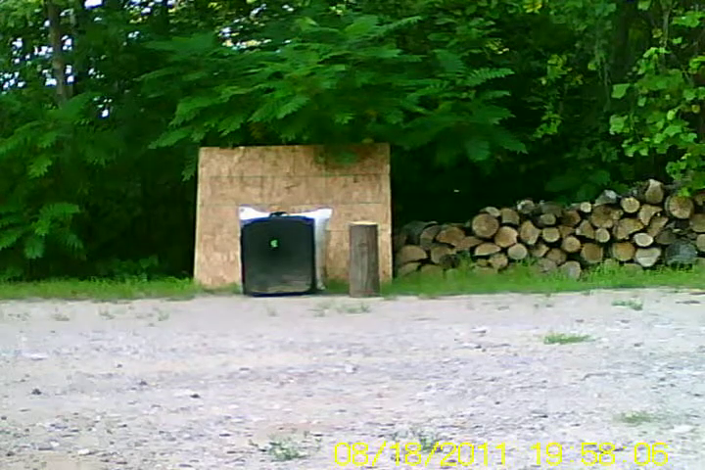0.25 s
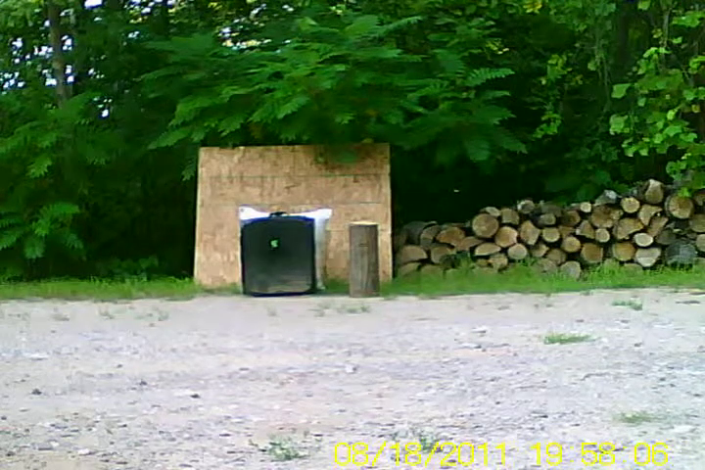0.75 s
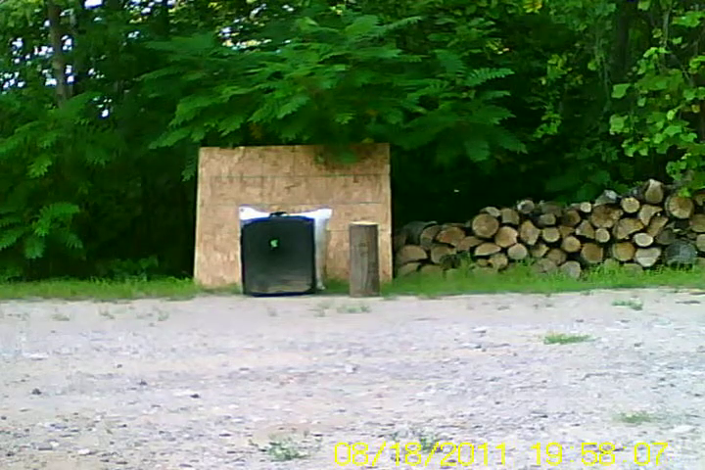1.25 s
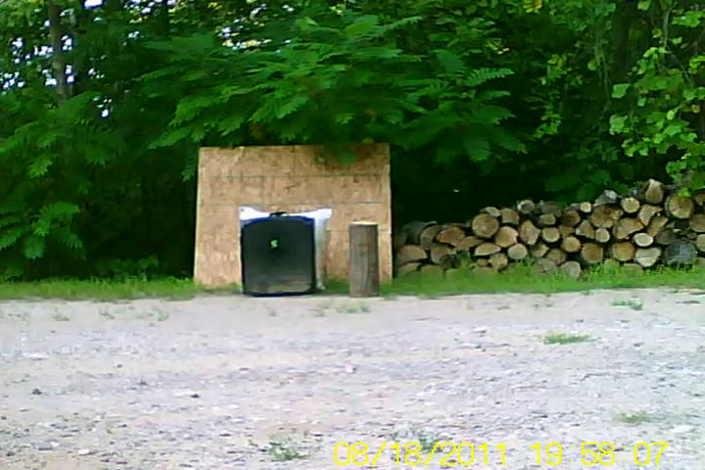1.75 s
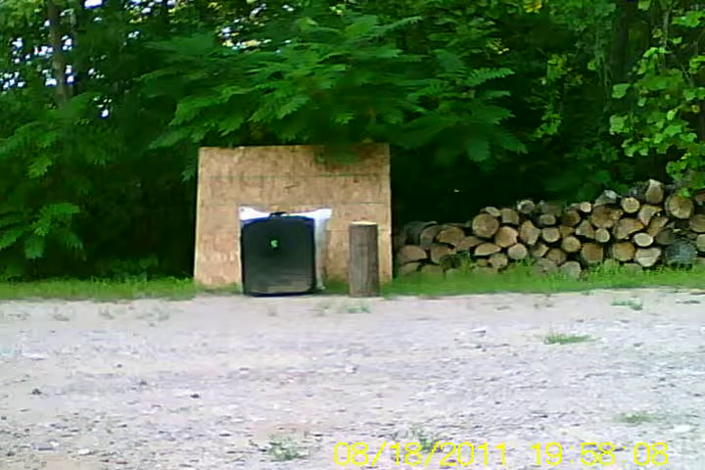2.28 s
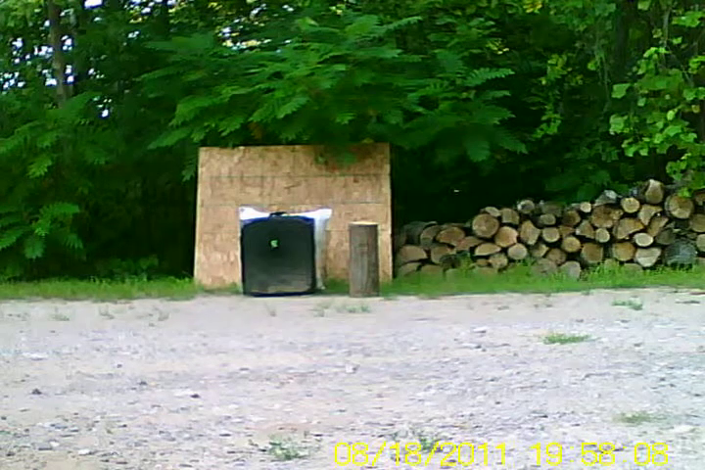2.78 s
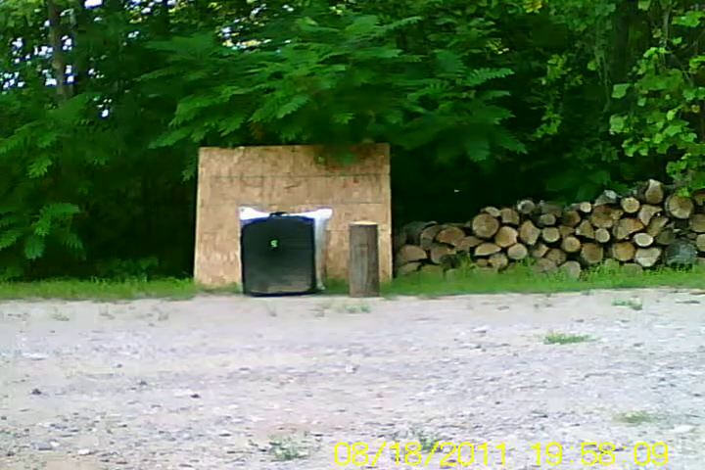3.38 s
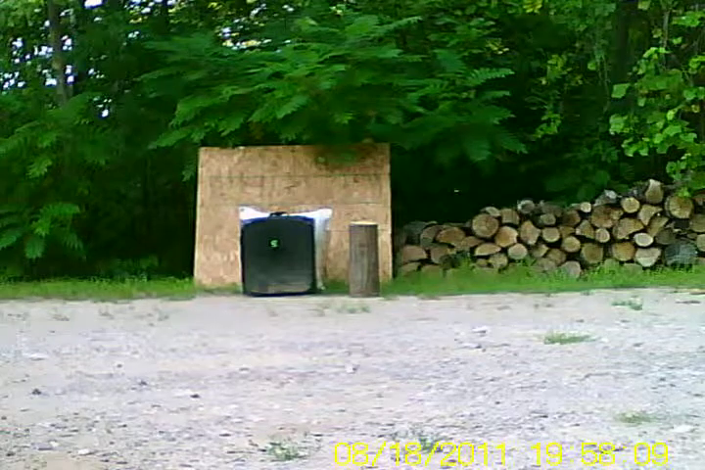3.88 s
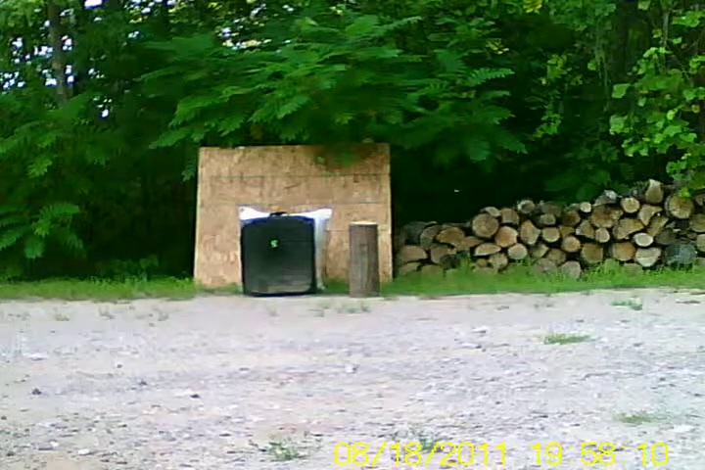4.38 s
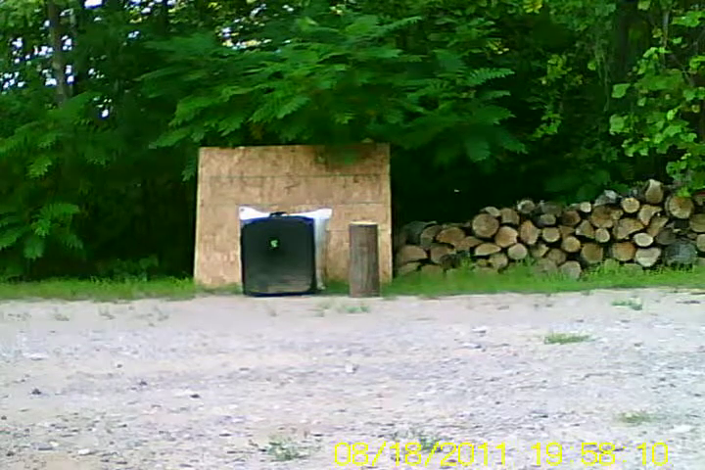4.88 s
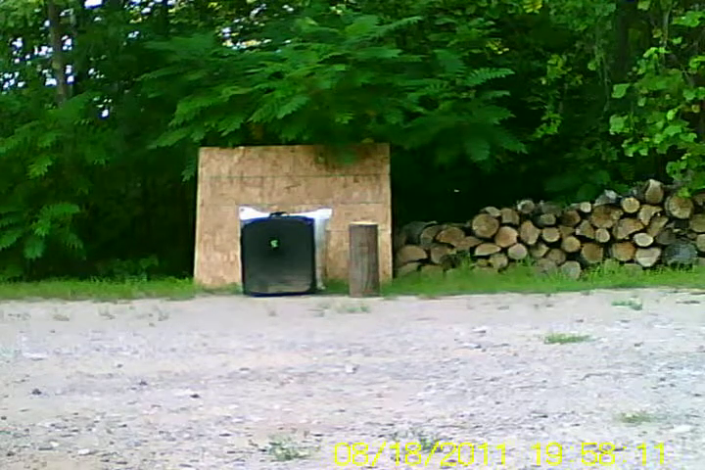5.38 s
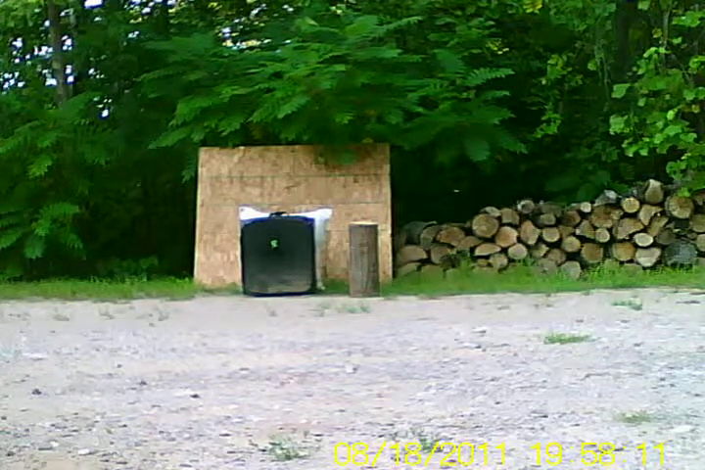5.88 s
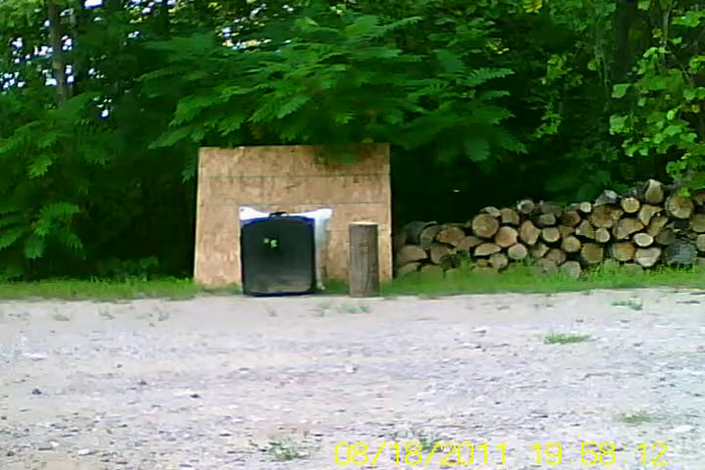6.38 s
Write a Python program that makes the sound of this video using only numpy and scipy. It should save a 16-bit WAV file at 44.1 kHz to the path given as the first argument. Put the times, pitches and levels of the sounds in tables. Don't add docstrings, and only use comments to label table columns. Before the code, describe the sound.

Outdoors in a yard, crickets chirp near and far over low rumble and recorder hiss, with three katydid rasps. Small hard clicks tick around two seconds, and a faint bird whistles. Near six seconds a bowstring slaps and rattles, an arrow whirs close past the microphone, and it thuds very loudly into a foam block, echoing off wood and trees.

```python
import sys
import numpy as np
from scipy import signal
from scipy.fft import rfft, irfft, next_fast_len
from scipy.io import wavfile

SR = 44100
rng = np.random.default_rng(int(sys.argv[2]) if len(sys.argv) > 2 else 0)


def wav_record(signal):
    frames = np.transpose(np.atleast_2d(signal))
    bounded = np.clip(frames, -1, 1)
    quanta = np.round(bounded * 32767).astype(np.int16)
    wavfile.write(sys.argv[1], SR, quanta)


def amplitude_ratio(level_db):
    exponent = np.asarray(level_db, float) / 20
    return 10 ** exponent


N = 292824
TIME = np.arange(N) / SR
LEAVES_S, STRIKES_S = 5.9, 6.055

# pitch_hz, density_db
AIR_SPECTRUM = [(8, -22), (18, 0), (40, 0), (90, -7), (180, -14), (350, -20), (700, -25.5), (1400, -30),
                (2800, -34.5), (5500, -36), (9000, -38), (11500, -42.5), (14000, -80)]
# time_s, level_db
ENGINE_LEVEL = [
    (0, -59),
    (1.1, -60),
    (1.6, -79),
    (6.64, -70),
]
# pitch_hz, width_hz, level_db
CRICKET_HAZE = [(4350, 700, -75.5), (4850, 600, -75.5)]
# centre_s, level_db
BIRD_NOTES = [
    (2.7, -72),
    (2.77, -70),
    (2.825, -65),
    (2.87, -72),
]
# start_s, level_db
KATYDID_RASPS = [
    (1.178, -57),
    (3.185, -58.5),
    (5.352, -58),
]
# pitch_hz, density_db
KATYDID_SPECTRUM = [(3300, -30), (4200, -3), (5200, -5), (6000, 1), (6800, -7), (7600, -6), (9000, -30)]
# middle_stroke_s, level_db
FAINT_CHIRPS = [(.47, -73), (.66, -71), (2.55, -69), (3.2, -71), (5.62, -73), (6.5, -72)]
# main_stroke_s, level_db
FAR_CHIRPS = [(.196, -53.5), (.437, -61.5), (.599, -53), (1.109, -52.5), (1.711, -54), (2.206, -53.5),
              (2.573, -54), (3.103, -53.5), (3.551, -52), (4.033, -52.5), (4.426, -53), (4.788, -52),
              (5.239, -52.5), (5.822, -54.5)]
# offset_s, level_db
FAR_STROKES = [
    (-.082, -14),
    (-.041, -2.5),
    (0, 0),
    (.044, .5),
]
# middle_stroke_s, level_db
NEAR_CHIRPS = [(.3365, -52), (1.3116, -50.5), (2.0434, -50.5), (2.9517, -51.5), (3.5265, -53),
               (4.0775, -52), (4.6303, -50.5), (5.1367, -50.3)]
# offset_s, level_db
NEAR_STROKES = [
    (-.0425, -9),
    (0, 0),
    (0.0473, 1.5),
]
# pitch_hz, t60_s
TREE_DECAY = [(150, .3), (600, 0.26), (1500, 0.67), (5000, 0.65), (10000, 0.39)]
# start_s, level_db, pitch_hz
GEAR_TICKS = [
    (1.998, -48, 2880),
    (2.012, -40, 2560),
    (2.092, -38, 2610),
]
# delay_s, level_db
TICK_ECHOES = [
    (.0085, -7),
    (.013, -5),
    (.021, -8),
    (.03, -12),
]
# pitch_hz, density_db
TRIGGER_SPECTRUM = [(1800, -28), (2600, -4), (3400, -10), (4600, 0), (6500, -8), (10000, -11), (13000, -40)]
# start_s, level_db, t60_s
STRING_SNAPS = [
    (5.895, -18.5, 0.022),
    (5.903, -21, 0.018),
    (5.913, -25, 0.037),
]
# pitch_hz, density_db
SNAP_SPECTRUM = [(300, -32), (900, 3), (1400, 2), (2600, 0), (4000, 0), (5700, -3.5), (7600, -10.5),
                 (10500, -20), (13000, -37)]
# pitch_hz, level_db, t60_s
LIMB_MODES = [(96, -22, 0.046), (230, -23, 0.046), (447, -24, 0.05), (628, -25.5, 0.065),
              (1290, -31.5, 0.078)]
# pitch_hz, density_db
RUSH_SPECTRUM = [(150, -26), (500, 1), (1300, -2), (2400, 0), (4000, -2.5), (5800, -6.5), (7600, -10),
                 (9000, -18), (11500, -18), (13000, -53)]
# pitch_hz, level_db, t60_s
VANE_SLAP = [(2100, -20.5, 0.035), (2520, -24, .04), (4020, -26.5, 0.033)]
# start_s, level_db, sense, pitch_hz, t60_s
KNOCKS = [
    (6.0546, 9, -1, 563, 0.0048),
    (6.059, 15.5, 1, 800, 0.0028),
    (6.0596, 20.5, -0.96, 664, 0.0037),
    (6.0628, 5, 1, 890, 0.0056),
    (6.0642, 6, 1, 710, 0.0068),
    (6.0663, 3.5, -0.92, 332, 0.0078),
]
# pitch_hz, level_db, t60_s
BLOCK_MODES = [(260, -16.5, .05), (396, -27, .04), (572, -16.5, .04), (780, -20, .04), (970, -21, .03),
               (1190, -15.5, .035), (1550, -11, .025), (1950, -17.5, 0.031), (2360, -22, 0.029)]
# pitch_hz, level_db, t60_s
BOARD_MODES = [(119, -2.5, 0.052), (174, -21, 0.071)]
# pitch_hz, density_db
TEAR_SPECTRUM = [(700, -24), (1600, 1), (2600, -11), (3800, -3), (5000, 3), (6200, -4), (7800, -7),
                 (11000, -23), (13000, -60)]
# pitch_hz, density_db
NEAR_ECHO_SPECTRUM = [(59, -30), (100, -4), (185, -1), (514, -9), (833, -7), (972, -13.5), (2450, -21),
                      (3270, -31), (5830, -27.5), (10000, -49), (13000, -80), (22000, -120)]
# pitch_hz, density_db
FAR_ECHO_SPECTRUM = [(180, -33), (300, -3), (550, -4), (595, -6), (1440, -5), (3440, -18), (5740, -15.5),
                     (7000, -28), (9100, -58), (15400, -120)]
# delay_s, level_db, favoured_hz
WALLS = [
    (.044, -17, 230),
    (.078, -25, 2100),
    (.138, -29, 1550),
    (.182, -32, 1250),
]


def unit(x):
    return x / np.sqrt(np.mean(x ** 2))


def along(points, hz):
    f, v = np.transpose(points)
    return np.interp(np.log(hz + 1), np.log(f + 1), v)


def noise(gain):
    m = next_fast_len(N)
    spectrum = rfft(rng.standard_normal(m)) * gain(np.fft.rfftfreq(m, 1 / SR))
    return unit(irfft(spectrum, m)[:N])


def peak_noise(hz, width):
    return noise(lambda f: 1 / (1 + ((f - hz) / width * 2) ** 2))


def coloured(spectrum):
    return noise(lambda hz: amplitude_ratio(along(spectrum, hz)))


def patchy(spectrum, depth_db, rate_hz):
    lumps = amplitude_ratio(depth_db * peak_noise(0, 2 * rate_hz))
    return unit(lumps * coloured(spectrum))


def dying(start, t60, attack):
    t = np.maximum(TIME - start, 0)
    return (1 - np.exp(-t / attack)) * amplitude_ratio(-60 * t / t60)


def ring(modes, start, attack):
    return sum(amplitude_ratio(db) * dying(start, t60, attack) * np.sin(2 * np.pi * hz * (TIME - start))
               for hz, db, t60 in modes)


def smear(x, tail):
    return signal.fftconvolve(x, tail / np.linalg.norm(tail))[:N]


def air():
    return amplitude_ratio(-46.5) * coloured(AIR_SPECTRUM)


def engine():
    level_db = np.interp(TIME, *np.transpose(ENGINE_LEVEL))
    return amplitude_ratio(level_db) * peak_noise(184, 9)


def cricket_haze():
    haze = np.zeros(N)
    for hz, width, db in CRICKET_HAZE:
        swell = amplitude_ratio(3.9 * peak_noise(0, 2.9))
        haze += amplitude_ratio(db) * swell * peak_noise(hz, width)
    return haze


def bird():
    notes = sum(amplitude_ratio(db) * np.exp(-((TIME - s) / .018) ** 2) for s, db in BIRD_NOTES)
    return notes * peak_noise(2750, 140)


def katydid():
    teeth = 1 + .5 * np.sin(2 * np.pi * 62 * TIME)
    rasps = sum(amplitude_ratio(db) * dying(s, 0.8, 0.013) for s, db in KATYDID_RASPS)
    return rasps * teeth * coloured(KATYDID_SPECTRUM)


def chirps(calls, strokes, scatter_db, scatter_s):
    luck = rng.standard_normal((len(calls), len(strokes), 2))
    return [(s + ds + scatter_s * late, db + step + scatter_db * loud)
            for (s, db), row in zip(calls, luck)
            for (ds, step), (late, loud) in zip(strokes, row)]


def cricket(strokes, hz, fall_hz, length, rough_hz, wet_db, t60):
    song = np.zeros(N)
    u = np.linspace(-1, 1, round(length * SR))
    for s, db in strokes:
        waver = rough_hz * np.sin(rng.uniform(3.8, 9) * u + rng.uniform(0, 2 * np.pi))
        pitch = hz + 9 * (db + 52) - fall_hz * u + waver
        swell = np.sqrt(np.abs(1 - u ** 2))
        tone = amplitude_ratio(db) * swell * np.sin(2 * np.pi * np.cumsum(pitch) / SR)
        first = round((s - .0015) * SR) - len(u) // 2
        song[first:first + len(u)] += tone
    leaves = rng.standard_normal(SR // 4) * amplitude_ratio(-60 * TIME[:SR // 4] / t60)
    return song + amplitude_ratio(wet_db) * smear(song, leaves)


def crickets():
    near_strokes = chirps(NEAR_CHIRPS, NEAR_STROKES, .8, .001)
    near = amplitude_ratio(.8) * cricket(near_strokes, 4390, 200, .019, rough_hz=25, wet_db=-7, t60=.12)
    far_strokes = chirps(FAR_CHIRPS, FAR_STROKES, 0.51, 0.0011)
    far = amplitude_ratio(-3.5) * cricket(far_strokes, 5030, 0, .023, rough_hz=45, wet_db=0, t60=.25)
    skirt = amplitude_ratio(-8) * cricket(far_strokes, 4820, 80, .014, rough_hz=60, wet_db=3, t60=.2)
    faint_strokes = chirps(FAINT_CHIRPS, FAR_STROKES, 1.5, .002)
    faint = cricket(faint_strokes, 4450, 250, .018, rough_hz=120, wet_db=10, t60=.25)
    return near + far + skirt + faint


def trees(x, delay):
    hz, t, z = signal.stft(rng.standard_normal(SR // 2), SR, nperseg=256)
    decay = amplitude_ratio(-60 * t / along(TREE_DECAY, hz)[:, None])
    tail = signal.istft(z * decay, SR, nperseg=256)[1]
    return smear(np.pad(x, (round(delay * SR), 0)), tail)


def walls(x):
    back = np.zeros(N)
    for delay, db, hz in WALLS:
        blur = rng.standard_normal(SR // 10) * dying(0, .07, .006)[:SR // 10]
        favoured = signal.butter(N=3, Wn=[hz / 1.4, hz * 1.5], btype="band", fs=SR, output="sos")
        band = signal.sosfilt(favoured, x)
        back += amplitude_ratio(db) * np.roll(smear(band, blur), round(delay * SR))
    return back


def gear_ticks():
    dry = np.zeros(N)
    for s, db, hz in GEAR_TICKS:
        modes = [(hz, db - .6, .013), (1.26 * hz, db - 2, .008), (1.53 * hz, db - 4, .006), (.8 * hz, db - 4, .008)]
        dry += ring(modes, s, 0.00073)
    echoes = sum(amplitude_ratio(db) * np.roll(dry, round(delay * SR)) for delay, db in TICK_ECHOES)
    return dry + echoes + amplitude_ratio(-7) * trees(dry, delay=.005)


def bow():
    click = amplitude_ratio(-36) * dying(5.8815, 0.07, .002) * patchy(TRIGGER_SPECTRUM, depth_db=2, rate_hz=400)
    snaps = sum(amplitude_ratio(db) * dying(s, t60, 0.001) for s, db, t60 in STRING_SNAPS)
    rattle = snaps * patchy(SNAP_SPECTRUM, depth_db=3, rate_hz=380)
    limbs = ring(LIMB_MODES, 5.896, 0.00063)
    rebound = amplitude_ratio(-4) * ring(LIMB_MODES[1:], 5.9053, 0.0005)
    return click + rattle - limbs - rebound


def arrow(passes=5.98, speed=62, miss=0.46, whir_hz=655):
    ahead = speed * (passes - TIME)
    metres = np.hypot(ahead, miss)
    toward = ahead / metres
    pitch = whir_hz / (1 - speed / 343 * toward)
    phase = 2 * np.pi * np.cumsum(pitch * (TIME > LEAVES_S)) / SR
    flying = dying(LEAVES_S, 1e3, .0064) * (TIME < STRIKES_S) / np.hypot(metres, .8)
    bent = (1 - np.cos(2 * np.pi * 28 * (TIME - 5.957))) / 2
    full = amplitude_ratio(-20.5 - 11 * bent ** 2) * np.sin(phase)
    half = amplitude_ratio(-22.5 - 16 * (1 - bent)) / np.sqrt(metres) * np.sin(phase / 2 + 1.4)
    fade_db = -1400 * np.maximum(TIME - passes + .004, 0)
    whir = flying * amplitude_ratio(fade_db) * (full + half)
    passing_hiss = amplitude_ratio(-31 - 5.5 * (1 - toward) / 2) * flying
    launch_hiss = amplitude_ratio(-29) * dying(LEAVES_S, .14, .015)
    rush = (passing_hiss + launch_hiss) * patchy(RUSH_SPECTRUM, depth_db=2.0, rate_hz=350)
    push = np.exp(-((TIME - 5.975) / 0.013) ** 2)
    wake = amplitude_ratio(-22.5) * push * np.sin(2 * np.pi * 113 * (TIME - 5.9665))
    return whir + rush + wake + ring(VANE_SLAP, 5.9765, 0.00085)


def target():
    knocks = sum(sense * ring([(hz, db, t60)], s, .002) for s, db, sense, hz, t60 in KNOCKS)
    tear = amplitude_ratio(-19.5) * dying(6.0546, 0.032, 0.00096) * coloured(TEAR_SPECTRUM)
    tip = amplitude_ratio(-7) * ring(BLOCK_MODES[-4:], 6.0552, .0006)
    block = ring(BLOCK_MODES, 6.0597, .0006)
    board = ring(BOARD_MODES, 6.0615, 0.0032)
    blow = knocks + tip + block + tear + board
    near = amplitude_ratio(-17.5) * dying(6.061, .14, 0.0036) * patchy(NEAR_ECHO_SPECTRUM, depth_db=1.0, rate_hz=120)
    far = amplitude_ratio(-37) * dying(6.09, .55, .06) * patchy(FAR_ECHO_SPECTRUM, depth_db=1.2, rate_hz=60)
    return blow + walls(blow) + near + far


def scene():
    release = bow() + arrow()
    shot = release + amplitude_ratio(-20.0) * trees(release, delay=0.013) + target()
    yard = gear_ticks() + crickets() + katydid() + bird() + cricket_haze() + air() + engine()
    return (shot + yard)[None]


def roll_off(x):
    return signal.sosfilt(signal.butter(12, 12050, fs=SR, output="sos"), x)


def record(dry):
    edge = signal.butter(N=10, Wn=10800, fs=SR, output="sos")
    x = signal.sosfilt(edge, dry)
    ceiling = .7
    x = x / (1 + np.abs(x / ceiling) ** 40) ** (1 / 40)
    mix = x - .0099
    return roll_off(mix)


dry = scene()
out = record(dry)
wav_record(out)
```